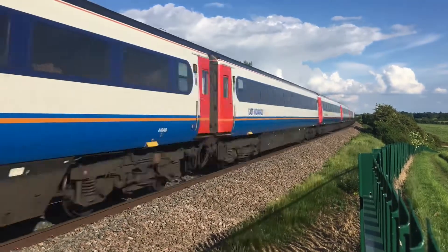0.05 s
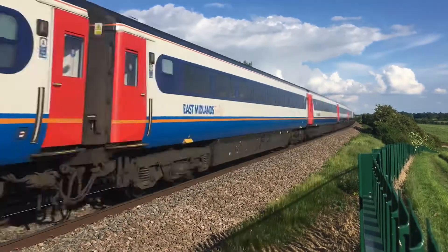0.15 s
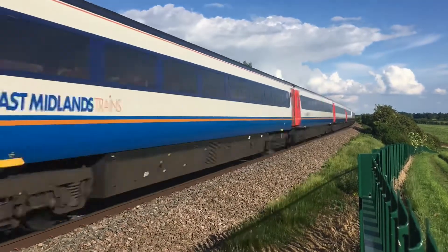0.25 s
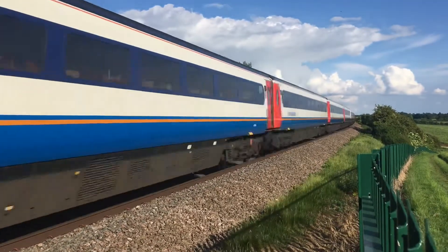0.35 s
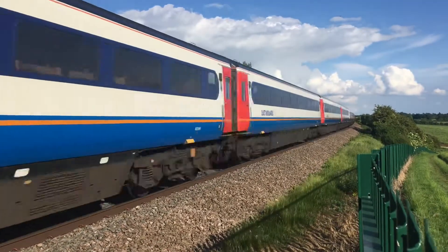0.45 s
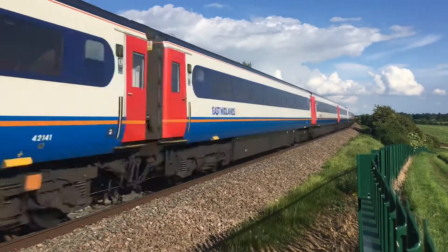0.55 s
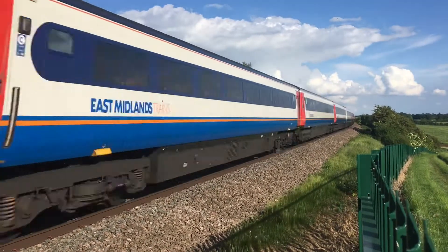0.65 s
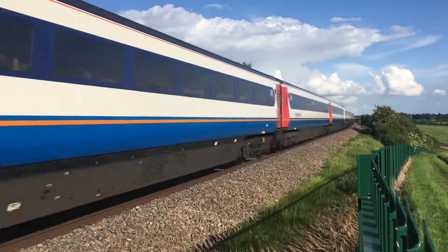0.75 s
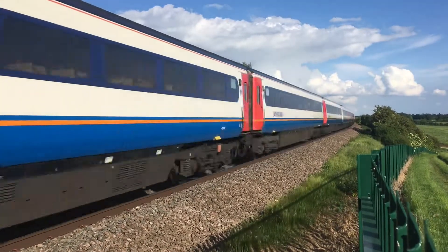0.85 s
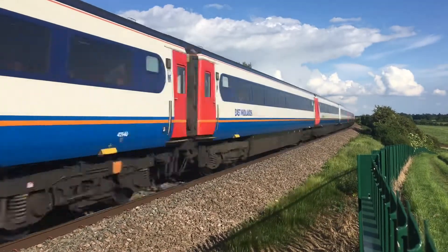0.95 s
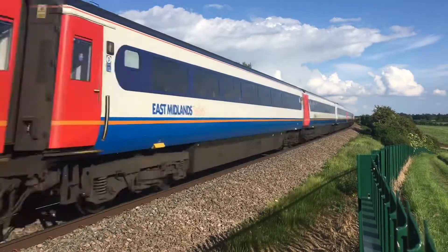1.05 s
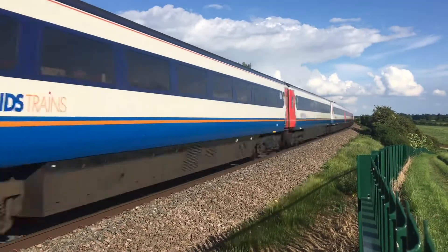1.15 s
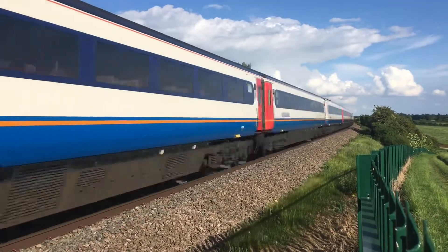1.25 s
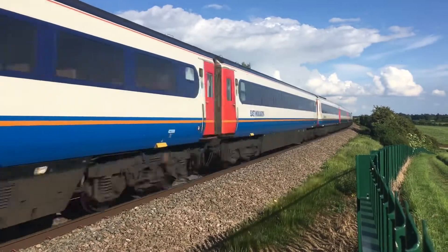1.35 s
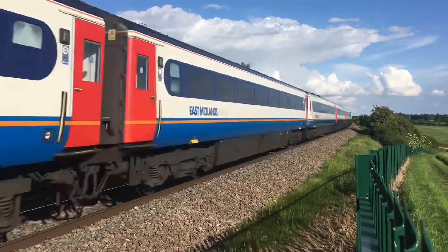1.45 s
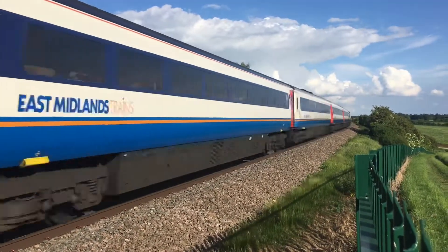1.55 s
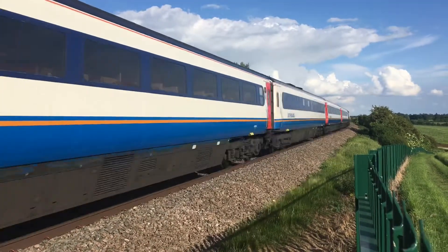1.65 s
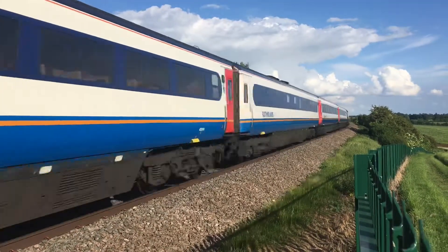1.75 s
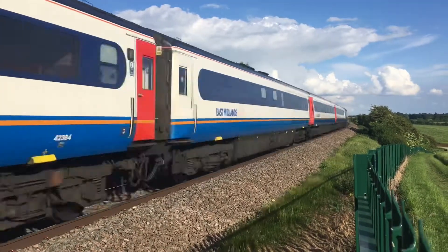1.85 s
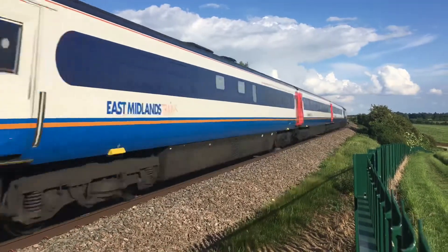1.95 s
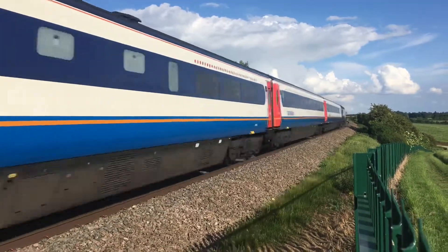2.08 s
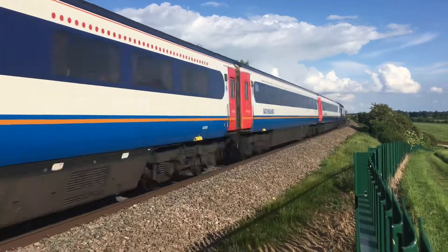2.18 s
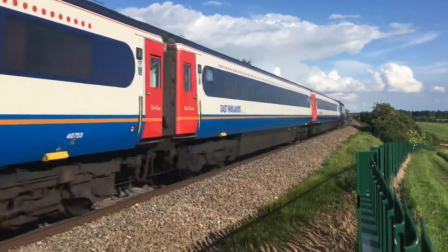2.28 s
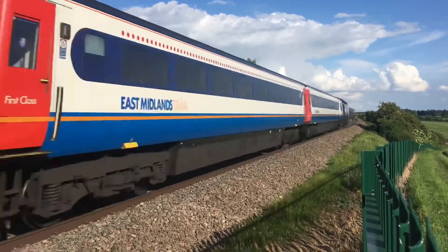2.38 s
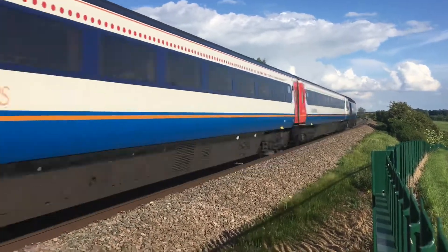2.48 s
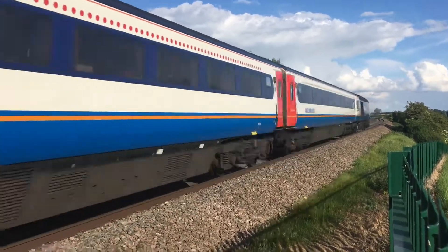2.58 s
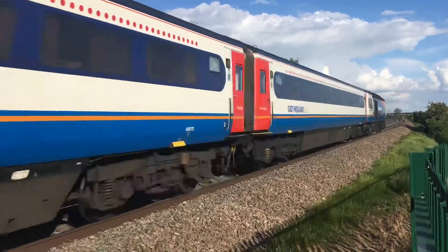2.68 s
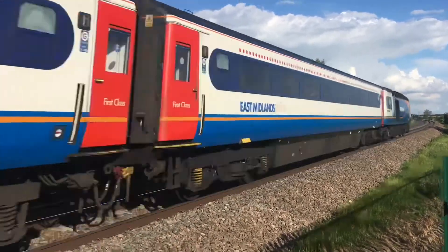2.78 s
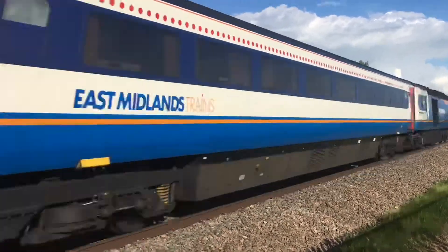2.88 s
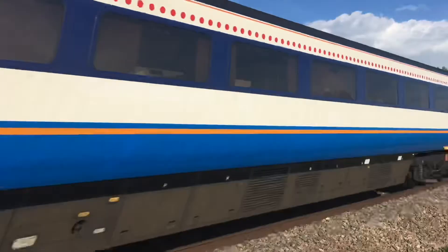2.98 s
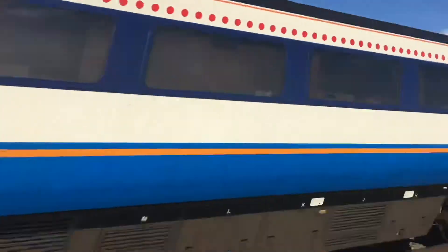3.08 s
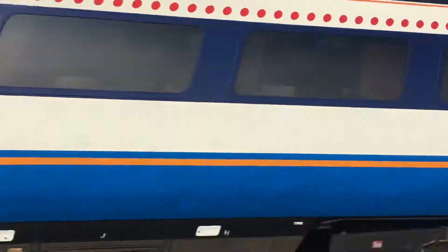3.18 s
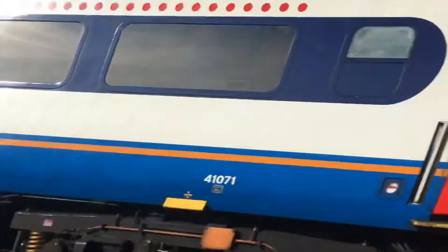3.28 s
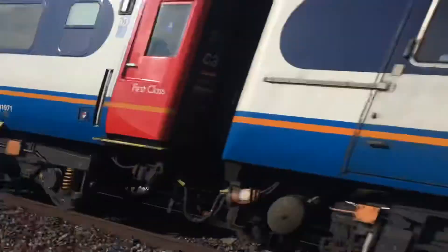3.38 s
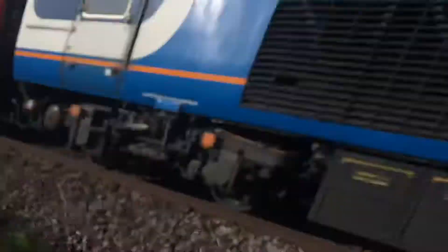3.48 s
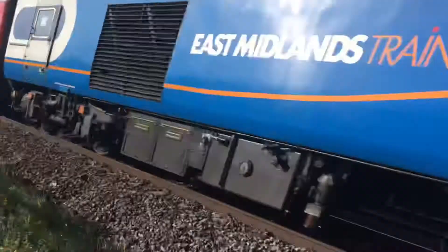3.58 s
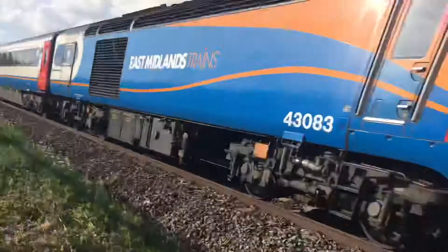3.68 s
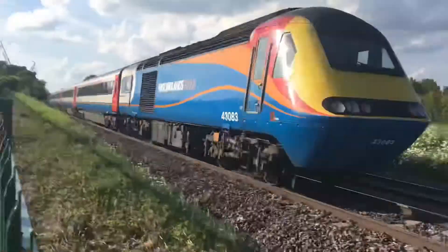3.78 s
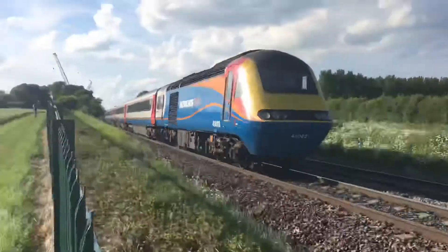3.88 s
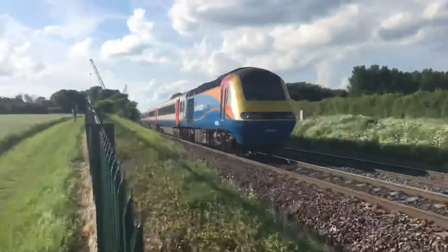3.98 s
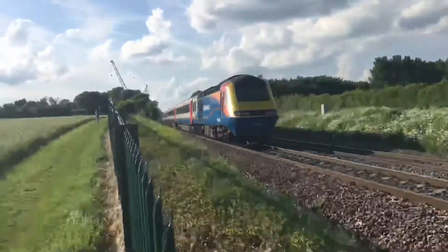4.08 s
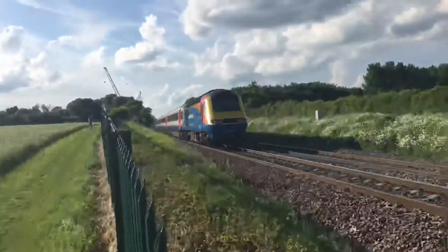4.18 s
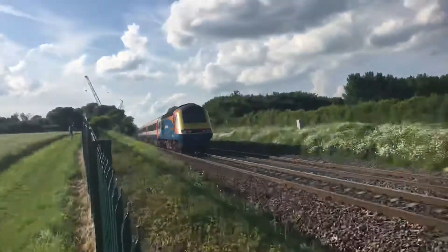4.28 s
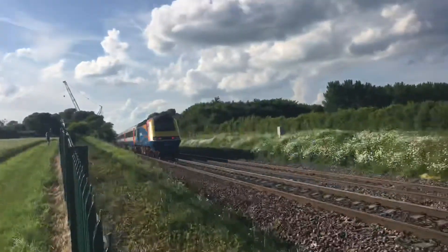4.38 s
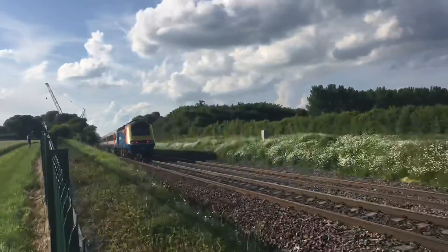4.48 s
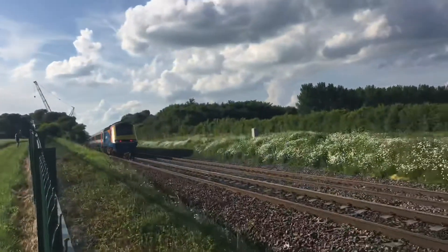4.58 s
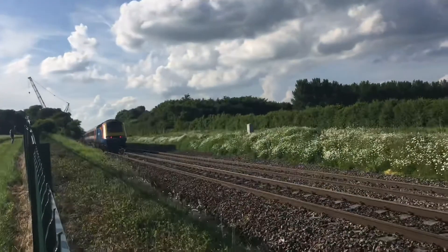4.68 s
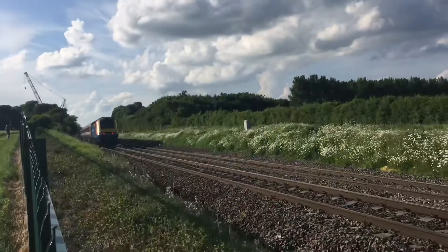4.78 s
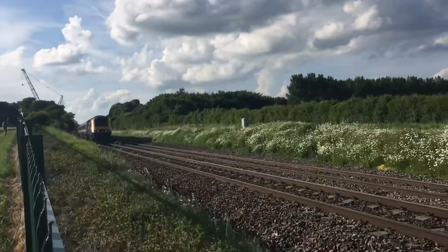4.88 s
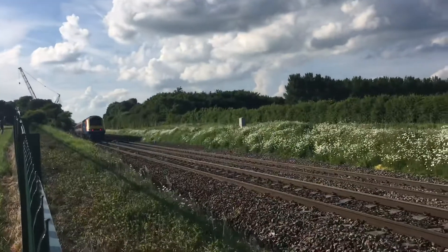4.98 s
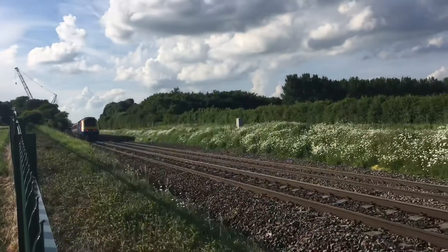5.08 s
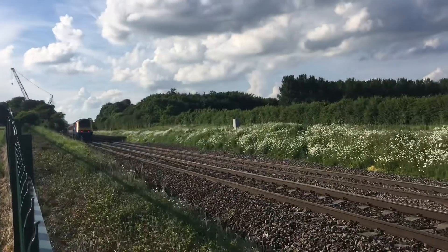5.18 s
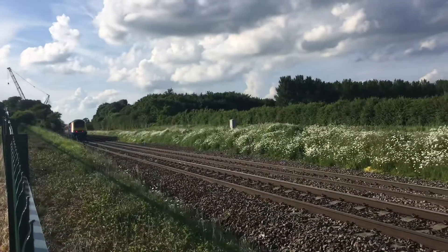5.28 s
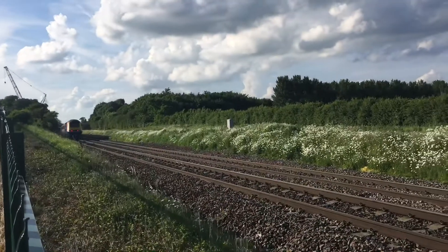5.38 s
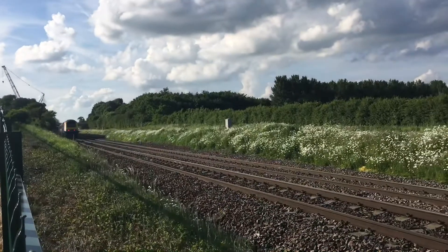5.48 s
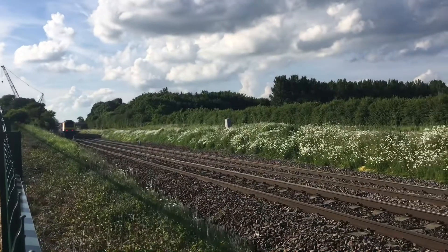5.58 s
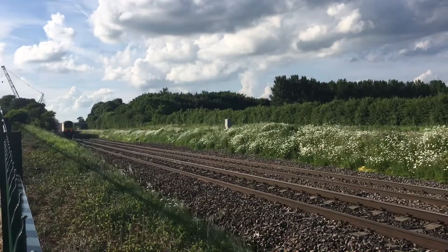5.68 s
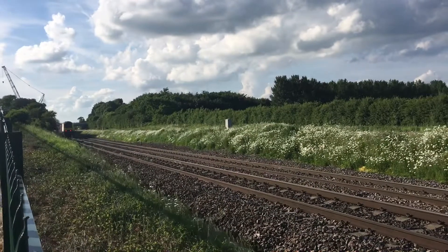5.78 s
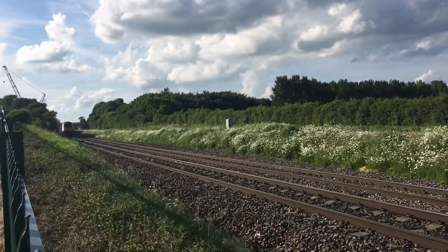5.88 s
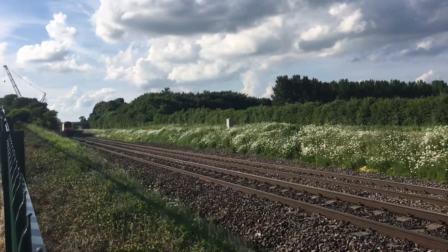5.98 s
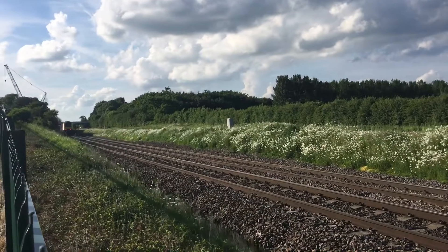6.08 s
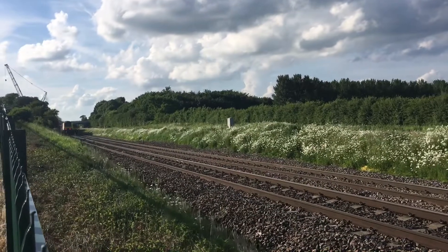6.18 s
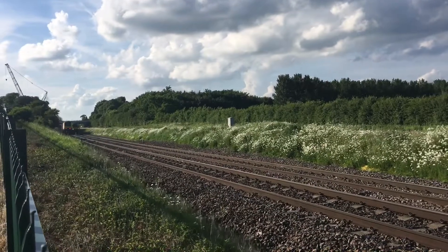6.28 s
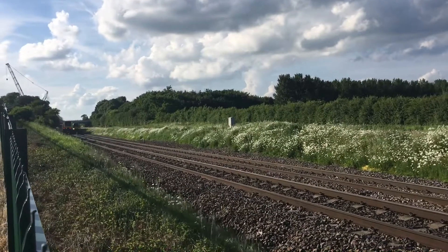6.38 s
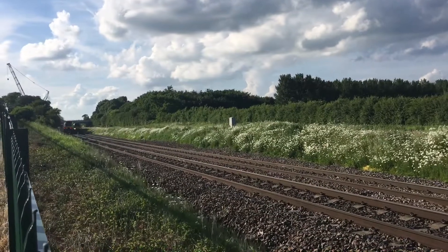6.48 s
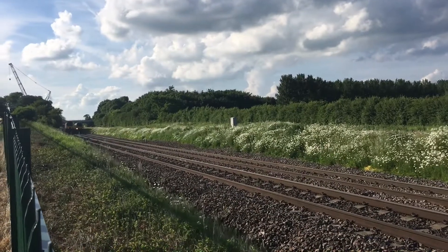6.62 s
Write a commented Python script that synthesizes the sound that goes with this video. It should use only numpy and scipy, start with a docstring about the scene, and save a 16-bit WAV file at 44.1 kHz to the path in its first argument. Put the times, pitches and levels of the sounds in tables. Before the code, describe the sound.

A fast train is already passing a few metres from a handheld phone in open countryside. Rail roar, ringing wheels and torn air swell about twice a second, with low drumming and gusts beneath. A flat wheel hammers briefly, the rear engine roars by loudest, then the rails sing and sizzle as it recedes.

```python
"""An express train races past a few metres from a phone on the lineside, its rear power car last.
Each pair of bogies brings a swell of rail roar, wheel ring and torn air, all shaped from noise.
Sleepers drum as a wavering low tone, steely whines swell, and one flat wheel hammers in a short
run of uneven blows. Then the rails sing on behind it, with bursts of high sizzle and a thin whistle."""
import sys
import numpy as np
from scipy import signal
from scipy.fft import rfft, irfft
from scipy.io import wavfile
from scipy.ndimage import uniform_filter1d

SR = 44100
rng = np.random.default_rng(int(sys.argv[2]) if len(sys.argv) > 2 else 0)


def inscribe(sig):
    """Save sig as 16-bit PCM at rate SR to the path in sys.argv[1].

    A 1-D sig is mono; a 2-D sig holds one channel per row.
    Samples are clipped to [-1, 1] before scaling.
    """
    pcm = np.round(np.clip(np.atleast_2d(sig).T, -1, 1) * 32767)
    wavfile.write(sys.argv[1], SR, pcm.astype(np.int16))


N = 293220
TIME_S = np.arange(N) / SR
TAIL_S = 3.827  # the last axle goes by

# blows of the flat wheel, one a turn: t/s, level/dB
FLAT_BLOWS = [(1.168, -17), (1.222, -11), (1.278, -9), (1.329, -8.5), (1.387, -13), (1.443, -11),
              (1.5, -19), (1.565, -13), (1.614, -12.5), (1.663, -12.5)]
# spectrum of the rail's roar: f/Hz, relative level/dB
RAIL_SPECTRUM = [(250, -16), (480, -10), (600, -3), (760, -1), (900, 1), (1040, -3.5), (1200, -0.5),
                 (1450, -12.5), (1800, -16.5), (2600, -45)]
# spectrum of the ringing wheels: f/Hz, relative level/dB
WHEEL_SPECTRUM = [(1300, -1), (1750, -1), (2050, -1), (2260, -1), (2500, -1), (2900, -7), (3800, -15.5),
                  (5000, -23)]
# spectrum of the treble hiss: f/Hz, relative level/dB
HISS_SPECTRUM = [(2500, 2.5), (3800, 3.5), (4600, -1), (5000, -5), (5700, 1.5), (6700, -2), (7500, -5),
                 (9700, -3.5), (10400, -10), (11100, -2.5), (13300, -2), (15700, -5.5)]
# spectrum of the rails' sizzle near the train: f/Hz, relative level/dB
NEAR_SIZZLE_SPECTRUM = [(5100, -7), (5700, 0), (6700, 2), (7300, -2), (9700, -1), (10400, -2.5), (11200, 2),
                        (13200, -1.5), (14300, -8), (15700, -10)]


def undb(db):
    """Decibels to gain."""
    return 10 ** (np.asarray(db) / 20)


def unit(x):
    """Scale to an rms of 1."""
    return x / np.sqrt(np.mean(x ** 2))


def noise():
    """Plain white noise."""
    return rng.standard_normal(N)


def ramp(start_s, end_s):
    """Rises from 0 to 1 between two times; at once if they are equal."""
    return np.clip((TIME_S - start_s) / max(end_s - start_s, 1 / SR), 0, 1)


def walk(rate):
    """Smooth random wander with a spread near 1, from about `rate` new steps a second."""
    k = max(int(SR / rate), 1)
    steps = np.repeat(rng.standard_normal(N // k + 1), k)
    smooth = uniform_filter1d(uniform_filter1d(steps, k), k)
    return unit(smooth[:N])


def colour(x, spectrum):
    """Give a sound a spectrum of (Hz, dB) points, silent beyond its ends; rms 1."""
    hz, db = np.transpose(spectrum)
    f = np.maximum(np.fft.rfftfreq(N, 1 / SR), 1)
    curve_db = np.interp(np.log(f), np.log(hz), db, left=-np.inf, right=-np.inf)
    return unit(irfft(rfft(x) * undb(curve_db), N))


def turbulence(spectrum, flicker_db, rate):
    """Coloured noise whose strength flickers."""
    return unit(colour(noise(), spectrum) * undb(flicker_db * walk(rate)))


def steady(x, window_s):
    """Even out a noise's slow swells, leaving its fast grain."""
    return x / np.sqrt(uniform_filter1d(x ** 2, int(window_s * SR)) + 1e-9)


def narrow(hz, width_hz):
    """A randomly driven resonance: a tone whose size and phase wander at the rate of its width."""
    phase = 2 * np.pi * np.cumsum(hz * np.ones(N)) / SR
    tone = walk(2 * width_hz) * np.cos(phase) + walk(2 * width_hz) * np.sin(phase)
    return steady(tone, window_s=0.24)


def shimmer(x, depth_db, rate):
    """Let each part of the treble wander in strength on its own."""
    f, spectrum = np.fft.rfftfreq(N, 1 / SR), rfft(x)
    centres_hz = np.linspace(4000, 14500, 6)
    total = np.zeros(N)
    for share in np.eye(len(centres_hz)):  # overlapping bands that add up to the whole
        band = irfft(spectrum * np.interp(f, centres_hz, share), N)
        total += band * undb(depth_db * walk(rate))
    return total


def steel(x, ripple_db, spacing_hz=70):
    """The rail's many close resonances comb a sound into fine peaks and troughs."""
    f = np.fft.rfftfreq(N, 1 / SR)
    ripple = np.interp(f / spacing_hz, np.arange(1000), rng.standard_normal(1000))
    return unit(irfft(rfft(x) * undb(ripple_db * ripple), N))


def swell(s, half_s, steep=4):
    """Gain of a source that goes by at time s; the more it beams sideways, the steeper."""
    return (1 + ((TIME_S - s) / half_s) ** 2) ** (-steep / 2)


def swells(times, halves, levels_db, steep):
    """Gain of several unrelated sources going by: their powers add."""
    power = np.zeros(N)
    for s, half_s, db in zip(times, halves, levels_db):
        power += (undb(db) * swell(s, half_s, steep)) ** 2
    return np.sqrt(power)


def doppler(s, turn_s):
    """Goes from 1 while a source approaches to -1 once it recedes."""
    dt = TIME_S - s
    return -dt / np.hypot(dt, turn_s)


def track_hum():
    """Rail and sleepers bounce together on their pads."""
    # swells of the low ring of the track: t/s, half length/s, level/dB
    hums = [(4.5, 0.65, -44), (6.252, .3, -43.5)]
    return swells(*np.transpose(hums), steep=2) * narrow(hz=367, width_hz=28)


def rail_hiss(level_db=-32.5, build_s=1.1, fade_s=0.58):
    """While the train is alongside, the rails hiss evenly between the bogies too."""
    gain = undb(level_db) * ramp(0, build_s) * (1 - ramp(TAIL_S - fade_s, TAIL_S))
    hiss = steel(colour(noise(), NEAR_SIZZLE_SPECTRUM), ripple_db=1.9)
    return gain * shimmer(hiss, depth_db=1.0, rate=18)


def sizzling_rails(trim_db=2.5, whistle_db=-48.0, whistle_follow=0.77, flicker_db=1.0, flutter_db=2.1):
    """Bursts of treble run along the steel; one wave loses little on the way and stands out as a whistle."""
    # bursts of high waves that the wheels send back along the rails:
    # start t/s, length/s, level before trim/dB
    burst_table = [(3.917, 0.16, -37), (4.287, .18, -35), (4.538, 0.084, -33), (4.673, .27, -34),
                   (5.062, .23, -38.5), (5.538, 0.3, -38), (5.96, 0.13, -38.5), (6.3, 0.11, -41)]
    # spectrum of the sizzle from far off: f/Hz, relative level/dB
    far_spectrum = [(5500, -24), (6200, -13), (6700, -3), (7300, -11), (10500, -8.5), (11300, 1.5),
                    (13200, 1), (14300, 3), (15700, -10)]
    floor_db = -40.5  # between bursts, before trim
    attack_s, release_s = 0.032, 0.063  # edges of a burst
    bursts = np.zeros(N)
    for s, length_s, db in burst_table:
        end_s = s + length_s
        bursts += undb(db) * ramp(s - attack_s, s) * (1 - ramp(end_s, end_s + release_s))
    gain = np.hypot(undb(floor_db), bursts * undb(flutter_db * walk(25)))

    far = ramp(3.7, 6.3)
    near_sizzle = turbulence(NEAR_SIZZLE_SPECTRUM, flicker_db, rate=60)
    far_sizzle = turbulence(far_spectrum, flicker_db, rate=100)
    sizzle = np.sqrt(1 - far) * near_sizzle + np.sqrt(far) * far_sizzle
    sizzle = shimmer(steel(sizzle, ripple_db=1.3), depth_db=0.8, rate=30)
    sizzle *= undb(trim_db) * gain * ramp(TAIL_S, TAIL_S)

    # the whistle partly follows the bursts
    whistle_gain = undb(whistle_db + 3.8 * walk(20)) * (gain / undb(floor_db)) ** whistle_follow
    whistle = whistle_gain * narrow(hz=6720, width_hz=150)
    return sizzle + whistle * ramp(4.2, 4.66)


def singing_rails(level_db=-18, edge_db=-12.0, near_edge_db=3, swell_db=1.5, spread=0.89):
    """The rails carry the wheels' noise back; with distance only their least damped resonances remain."""
    # spectrum of the rail song near the train: f/Hz, relative level/dB
    near_spectrum = [(110, -26), (170, -21), (300, -19.5), (375, -15), (430, -15.5), (520, -15.5),
                     (680, -1.5), (1100, -2.5), (1350, -8), (1650, -4), (2100, -7), (2500, -24.5)]
    # spectrum of the song from far off: f/Hz, relative level/dB
    far_spectrum = [(110, -14.5), (200, -15.5), (470, -10.5), (530, -9), (680, -1.5), (1200, 2.5),
                    (1450, -1.5), (1900, 2.5), (2080, -13), (2400, -24)]
    # upper edge of the song, trailing off into a smooth hiss: f/Hz, relative level/dB
    edge_spectrum = [(1700, -18), (2150, -2.5), (2450, -5), (3000, -12.5), (4000, -15.5), (5000, -20),
                     (6000, -19), (9000, -28.5)]
    # narrow resonances that stay in the rails: f/Hz, width/Hz, level before trim/dB
    rail_modes = [(564, 7, -43.5), (682, 25, -45), (1194, 24, -44), (1311, 33, -39), (1845, 40, -38),
                  (1994, 40, -40.5), (1980, 50, -44)]
    peak_s, rise_db = 4.51, 0.5  # the rails sing loudest a little behind the train
    distance = np.maximum((TIME_S - TAIL_S) / (peak_s - TAIL_S), 1)  # relative to that at the peak
    early = 1 - ramp(TAIL_S, peak_s)
    dip_db = -4.0 * swell(4.22, half_s=0.27)  # the level dips briefly before its peak
    gain = undb(level_db - rise_db * early + dip_db) / distance ** spread

    far = ramp(4.64, 5.78)
    # sound from a long stretch of rail adds up smoothly
    near_song = colour(noise(), near_spectrum)
    far_song = colour(noise(), far_spectrum)
    edge = undb(edge_db + near_edge_db * early) * colour(noise(), edge_spectrum)
    song = np.sqrt(1 - far) * near_song + np.sqrt(far) * far_song + edge

    modes = np.zeros(N)
    for hz, width_hz, db in rail_modes:
        modes += undb(db + swell_db * walk(3.97)) * narrow(hz, width_hz)
    modes *= undb(-0.175 + 0.05 * far)  # trim
    return (gain * song + modes) * np.sqrt(ramp(TAIL_S, 4.04))


def power_car(s=3.496, half_s=0.67, level_db=-12.5):
    """Engine and cooling fans roar through the grilles."""
    # spectrum of engine and fans: f/Hz, relative level/dB
    engine_spectrum = [(25, -9), (120, 0), (200, 2), (250, 1.5), (330, -1), (500, -14), (900, 4),
                       (1500, 0.5), (2100, 4), (3000, -10), (4900, -17), (5800, -10), (7800, -18.5),
                       (14000, -20.5)]
    roar = turbulence(engine_spectrum, flicker_db=0.4, rate=50)
    return undb(level_db) * swell(s, half_s, steep=5.56) * roar


def rumble(wobble=0.0251, uneven_db=3.5, near_drum_db=-1.0, far_drum_db=-0.5, wake_lump_db=1.8):
    """Low buffeting air, in gusts and then in a dying wake, and the drumming of axles over the sleepers."""
    # strongest gusts of the slipstream: t/s, half length/s, level/dB
    gusts = [(0.175, .11, -24.5), (0.694, .11, -19), (1.08, 0.23, -19), (1.49, 0.044, -13.5),
             (1.935, 0.17, -15.5), (2.452, .09, -13), (2.806, 0.14, -14), (3.33, 0.6, -15.5),
             (4.66, 0.26, -27.5), (5.09, 0.041, -28), (5.323, 0.19, -30.5)]
    # spectrum of the buffeting air: f/Hz, relative level/dB
    pressure_spectrum = [(18, -24), (30, -19), (42, -4), (60, 2), (85, -7), (115, -12), (170, -23),
                         (300, -29)]
    sleeper_hz, receding_sleeper_hz = 83.3, 63.8  # sleepers per second under an axle, as heard
    gone = (1 - doppler(TAIL_S, turn_s=0.07)) / 2  # 0 while the train passes, 1 behind it
    age_s = np.maximum(TIME_S - TAIL_S, 0)
    slipstream_db = -23 - 11.5 * (1 - ramp(0, 0.81))  # dragged air builds up along the train
    wake_db = -28 - 1.85 * age_s + wake_lump_db * walk(19)  # eddies behind the train
    air_gain = undb((1 - gone) * slipstream_db + gone * wake_db)
    gain = np.hypot(air_gain, swells(*np.transpose(gusts), steep=4))

    hz = sleeper_hz + gone * (receding_sleeper_hz - sleeper_hz)
    phase = 2 * np.pi * np.cumsum(hz * (1 + wobble * walk(22.1))) / SR
    drum = unit(np.sin(phase) * undb(uneven_db * walk(14)))
    drum *= undb((1 - gone) * near_drum_db + gone * far_drum_db)  # relative to the air
    air = colour(noise(), pressure_spectrum)
    return gain * steady(air + drum, window_s=0.16)


def flat_wheel(t60_s=0.064, ring_db=-4, crack_db=-15):
    """A worn flat slaps the rail once a turn; rail and wheel ring briefly."""
    blows = np.zeros(N)
    for s, db in FLAT_BLOWS:
        decay = np.exp(-np.log(1000) * np.abs(TIME_S - s) / t60_s)  # falls 60 dB in t60_s
        blows += (TIME_S >= s) * undb(db) * decay
    rail = colour(noise(), RAIL_SPECTRUM)
    wheel = colour(noise(), WHEEL_SPECTRUM)
    crack = colour(noise(), HISS_SPECTRUM)
    return blows * (rail + undb(ring_db) * wheel + undb(crack_db) * crack)


def lift_off(depth=0.21, lead_s=0.0096):
    """Just before each slap the flat unloads the rail, and the rolling noise sinks."""
    dips = sum(np.exp(-((TIME_S - s + lead_s) / lead_s) ** 2) for s, _ in FLAT_BLOWS)
    return 1 - depth * dips


def steely_whine(half_s=0.14, sag=0.014, turn_s=0.092, waver_db=2.5):
    """Swells of steely whine, each sagging in pitch; the last two come once the train has gone by."""
    # swells of whine: t/s, middle pitch f/Hz, level/dB
    whines = [(0.06, 2244, -32), (0.56, 2240, -27), (1.17, 2217, -22.5), (1.48, 2280, -27),
              (1.84, 2294, -28), (2.10, 2206, -28), (2.72, 2203, -23.5), (3.14, 2210, -22),
              (4.05, 2184, -29), (4.421, 2190, -27.5)]
    whine = np.zeros(N)
    for s, hz, db in whines:
        heard_hz = hz * (1 + sag * doppler(s, turn_s))
        whine += undb(db) * swell(s, half_s, steep=2.0) * narrow(heard_hz, width_hz=125)
    return whine * undb(waver_db * walk(30))


def bogies(turn_hz=18.2, throb=0.084, rail_trim_db=-1.4, wheel_trim_db=-0.44, hiss_trim_db=1.35):
    """Rough steel drives rails and wheels, throbbing with each wheel turn; air tears round the running gear."""
    # pairs of bogies going by: t/s, half length/s, then level/dB of
    # rail roar, wheel ring, air rush and hiss (all but the rush before trim)
    passes = [(-0.04, 0.19, -21.5, -27.5, -30, -35.5), (0.316, 0.23, -20.5, -25.5, -28.5, -33.5),
              (0.712, 0.27, -22, -25, -23.5, -30.5), (1.187, .28, -17, -19.5, -20, -26.5),
              (1.605, .2, -13, -21.5, -19.5, -28.5), (2.042, .18, -13.5, -21, -17.5, -24.5),
              (2.46, .21, -16, -20.5, -19.5, -26.5), (2.908, 0.27, -18, -23, -18.5, -25.5),
              (3.428, 0.22, -12, -15.5, -19, -24.5), (3.728, .17, -16.5, -19.5, -37, -28)]
    # spectrum of the rushing air: f/Hz, relative level/dB
    rush_spectrum = [(70, -4), (120, 1), (170, 0.5), (230, -6), (320, -12), (480, -8.5), (800, -20.5),
                     (1600, -36)]
    s, half_s, rail_db, wheel_db, rush_db, hiss_db = np.transpose(passes)
    ahead_s = s - 0.028  # ring, rush and hiss come just ahead of the rail's roar
    rail_gain = swells(s, half_s, rail_db, steep=3.08)
    wheel_gain = swells(ahead_s, half_s, wheel_db, steep=2.19)
    rush_gain = swells(ahead_s, half_s, rush_db, steep=3.88)
    hiss_gain = swells(ahead_s, half_s, hiss_db, steep=3.12)
    turn_phase = 2 * np.pi * np.cumsum(turn_hz * (1 + 0.028 * walk(3))) / SR
    turn = 1 + throb * np.sin(turn_phase)

    # the rail bends between sleepers near 1 kHz, most under the roughest wheels
    span = undb(-6) * (rail_gain / undb(-20)) ** 0.57 * narrow(hz=1020.5, width_hz=100)
    rail_roar = turbulence(RAIL_SPECTRUM, flicker_db=1.4, rate=45) + span
    rail = undb(rail_trim_db) * rail_gain * rail_roar
    # the wheel discs ring an octave higher
    wheel = undb(wheel_trim_db) * wheel_gain * turbulence(WHEEL_SPECTRUM, flicker_db=1.5, rate=40)
    rush = rush_gain * steady(turbulence(rush_spectrum, flicker_db=1.0, rate=61), window_s=0.11)
    hiss = shimmer(turbulence(HISS_SPECTRUM, flicker_db=1.03, rate=50), depth_db=0.35, rate=25)
    hiss *= undb(hiss_trim_db) * hiss_gain
    return turn * lift_off() * (rail + wheel) + rush + hiss


def scene():
    """Everything reaches one microphone, so both channels are the same."""
    behind = track_hum() + sizzling_rails() + singing_rails()
    passing = rail_hiss() + power_car() + rumble() + flat_wheel() + bogies()
    mono = behind + passing + steely_whine()
    return np.array([mono, mono])


def record(dry):
    """The phone rounds off the tallest peaks and cuts the top."""
    held = dry / (1 + dry ** 8) ** (1 / 8)
    low_pass = signal.ellip(12, 0.1, 80, 15750, fs=SR, output="sos")  # cuts above 15750 Hz
    return signal.sosfilt(low_pass, held)


dry = scene()
out = record(dry)
inscribe(out)
```